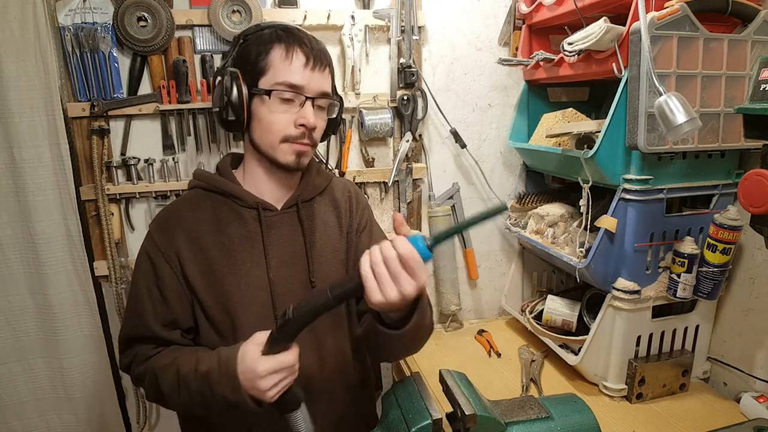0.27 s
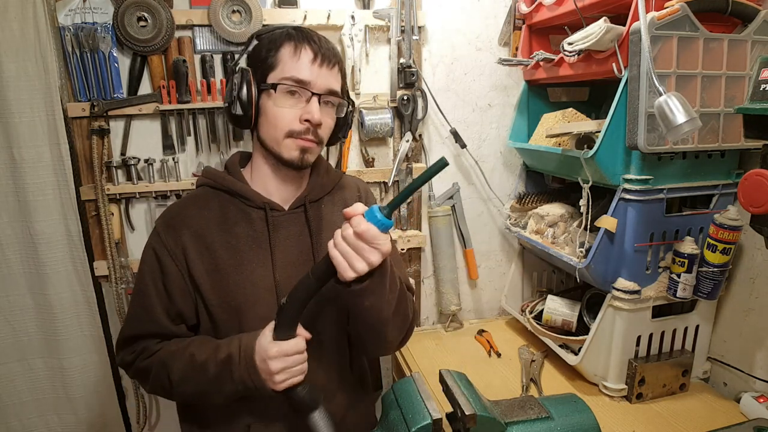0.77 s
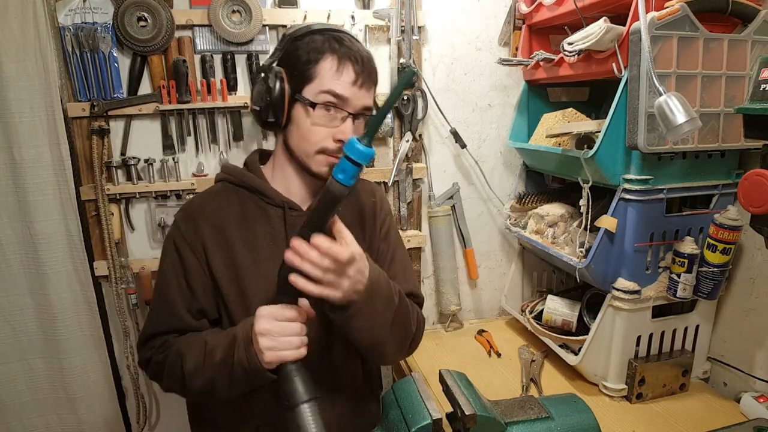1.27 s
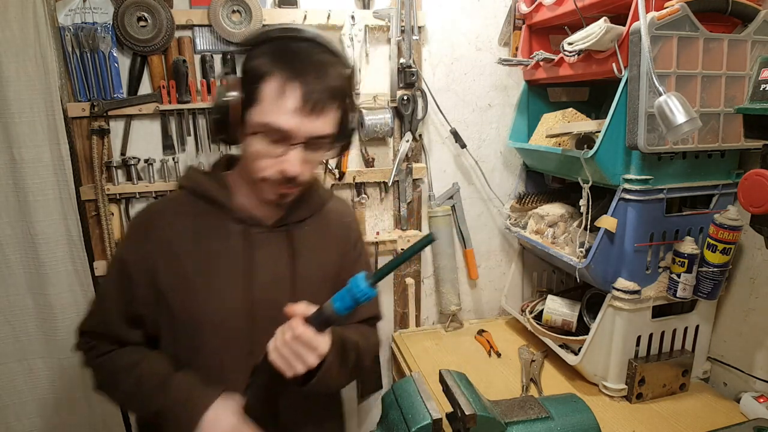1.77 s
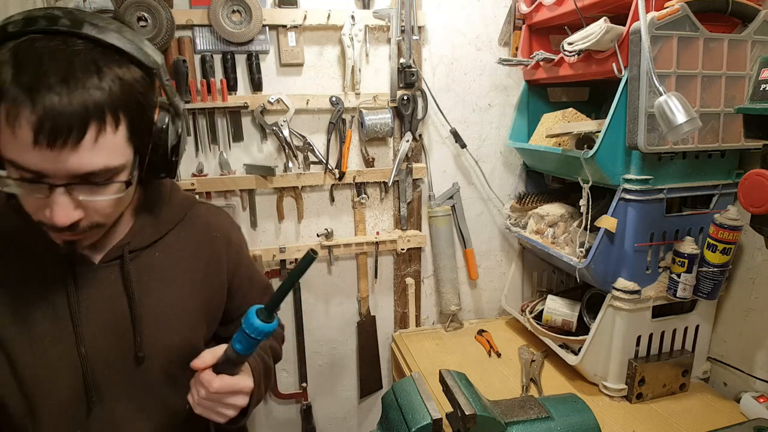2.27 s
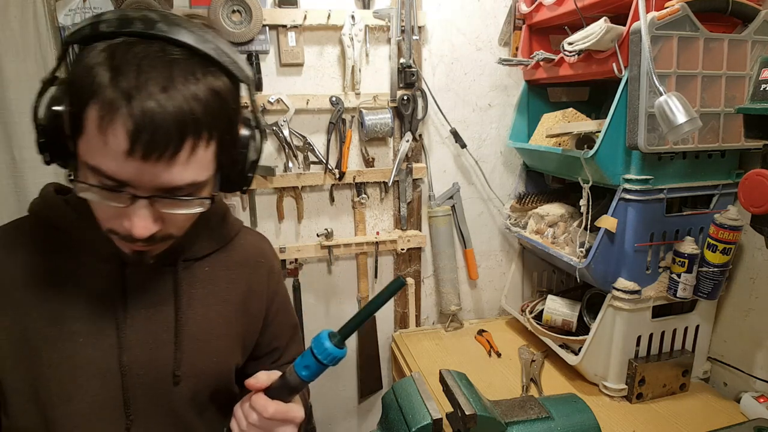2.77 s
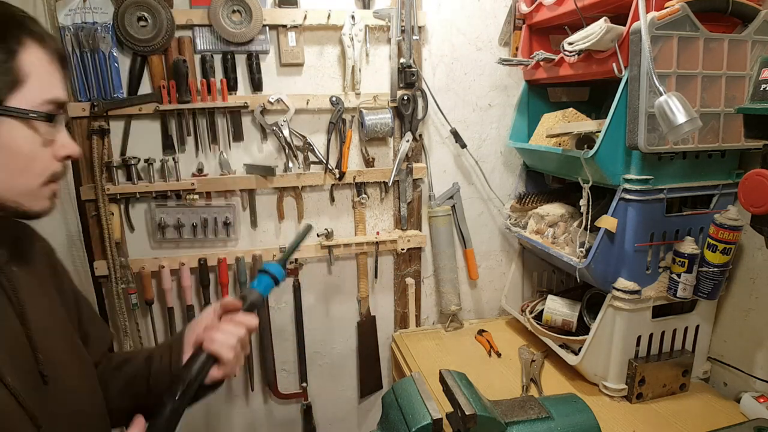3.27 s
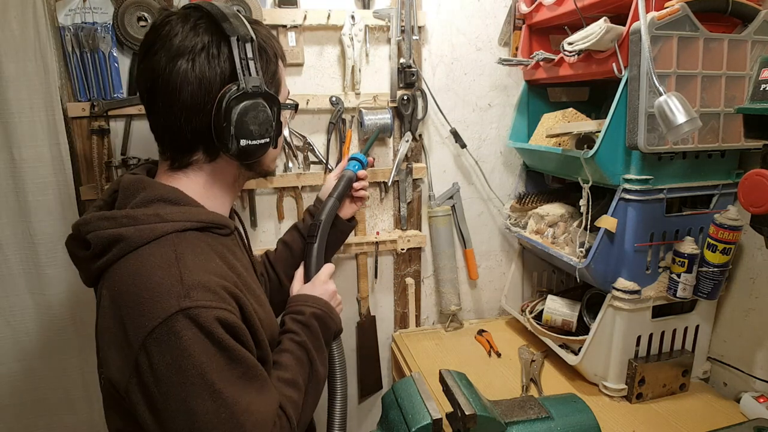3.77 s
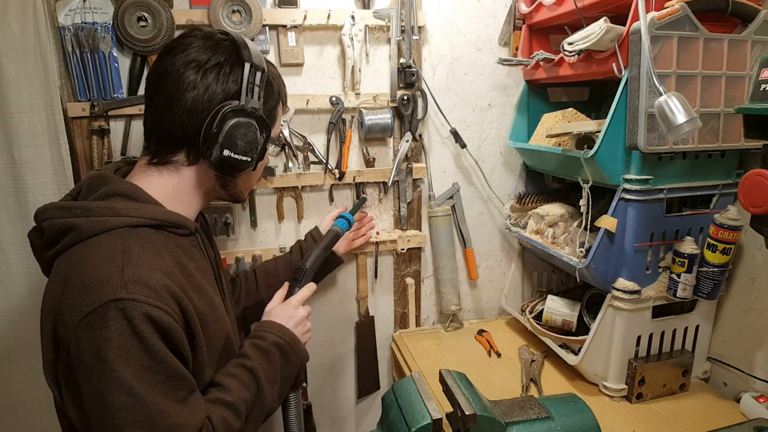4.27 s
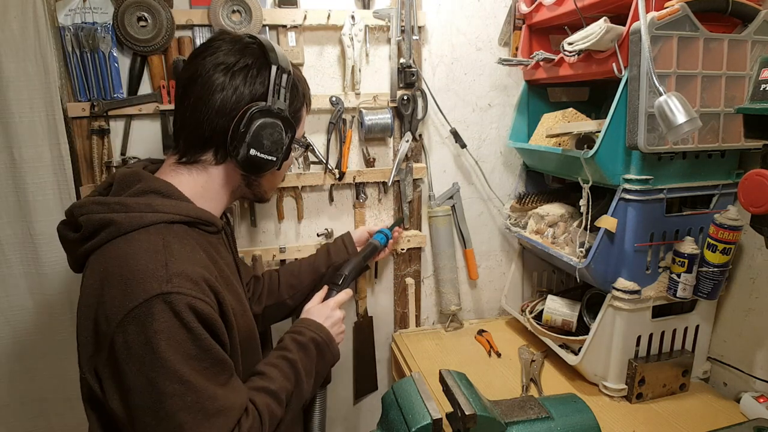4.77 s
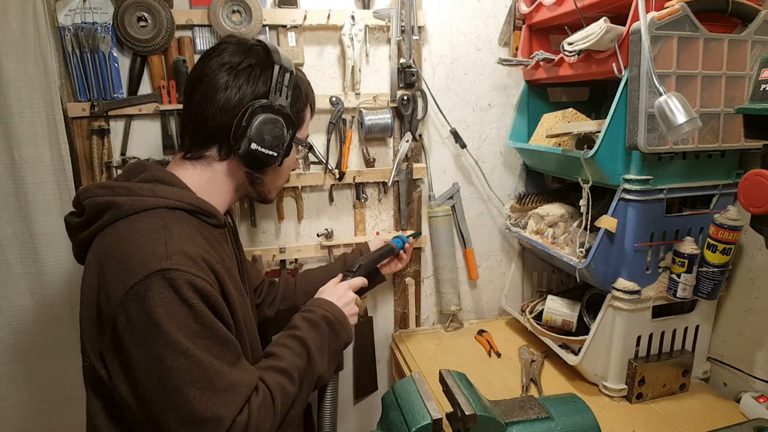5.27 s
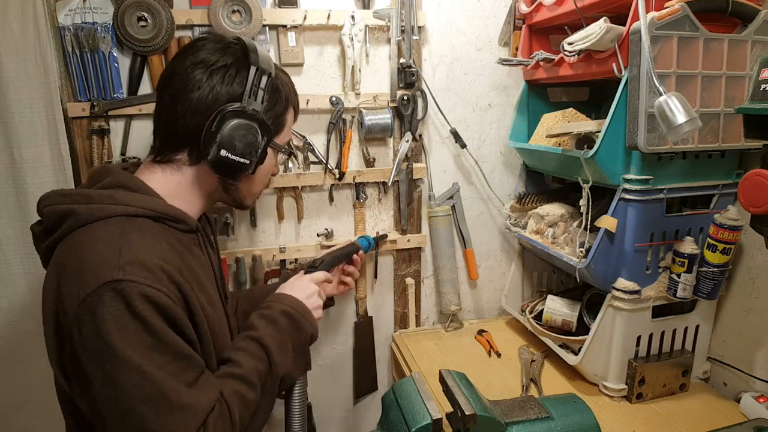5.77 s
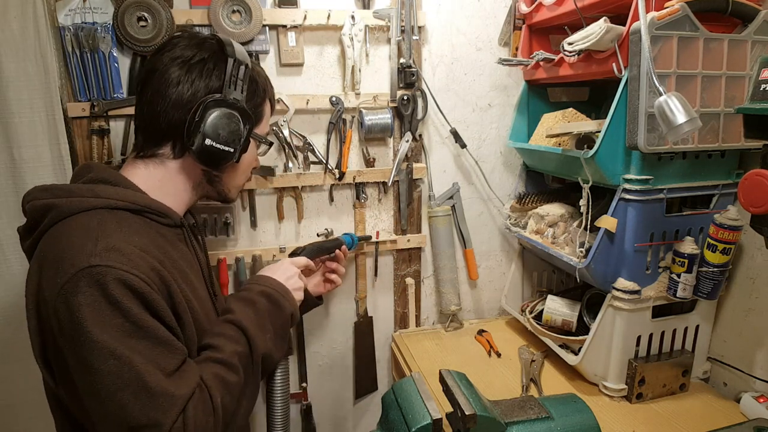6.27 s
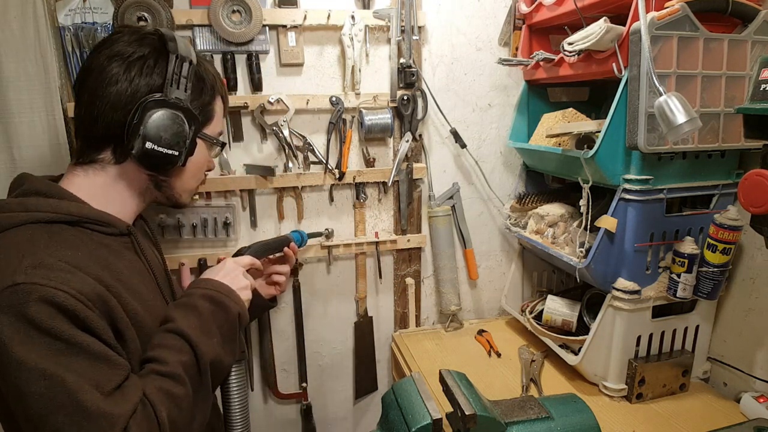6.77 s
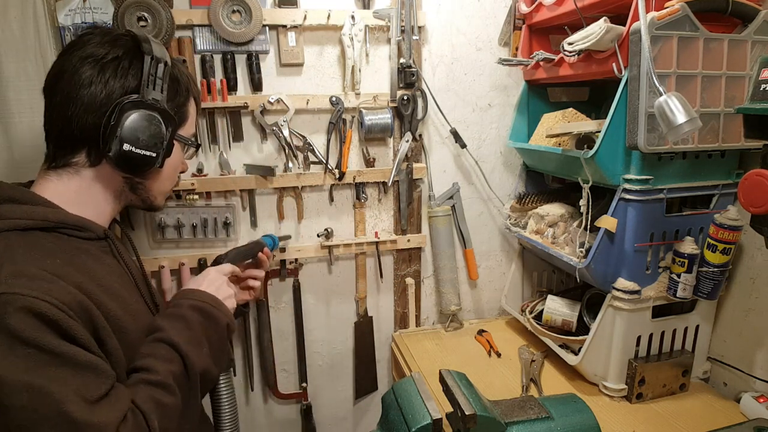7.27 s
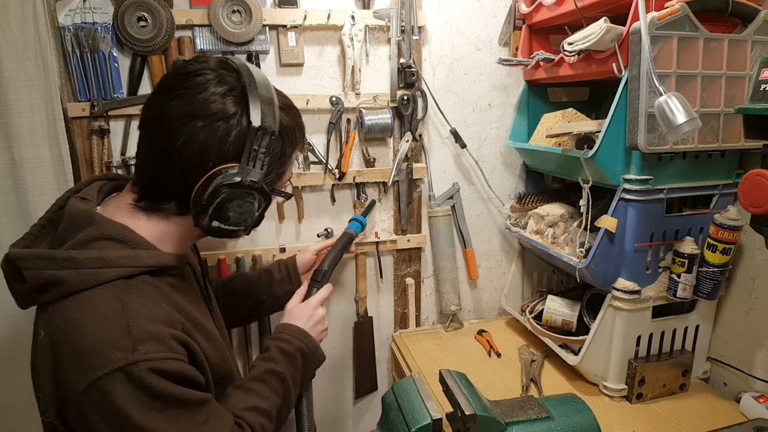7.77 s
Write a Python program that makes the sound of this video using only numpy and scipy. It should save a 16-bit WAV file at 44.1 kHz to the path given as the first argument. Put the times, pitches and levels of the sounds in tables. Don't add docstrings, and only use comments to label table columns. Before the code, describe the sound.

Faint plastic squeaks, clicks and soft footsteps in a quiet workshop, then a shop vacuum spins up abruptly and roars steadily with hissing nozzle air.

```python
import sys
import numpy as np
from scipy import signal
from scipy.fft import rfft, irfft, next_fast_len
from scipy.io import wavfile
from scipy.ndimage import uniform_filter1d, map_coordinates

SR = 44100
rng = np.random.default_rng(int(sys.argv[2]) if len(sys.argv) > 2 else 0)


def gain_from_decibels(decibels):
    exponent = np.asarray(decibels, float) / 20
    return 10 ** exponent


def log_audio(samples):
    frames = np.atleast_2d(samples).T
    limited = np.clip(frames, -1, 1)
    pcm = np.round(limited * 32767).astype(np.int16)
    wavfile.write(sys.argv[1], SR, pcm)


N = 354211
T = np.arange(N) / SR
ON_S = 3.056
SWITCH_ON = np.clip((T - ON_S) / .012, 0, 1)
EARLY_UNTIL_S = 3.77
MAINS_BUZZ_HZ = 99.8


def unit(x):
    return x / np.sqrt(np.mean(x ** 2) + 1e-20)


def along(points, hz):
    f, v = np.transpose(points)
    return np.interp(np.log(hz + 1), np.log(f + 1), v)


def curve(rows):
    s, value = np.transpose(rows)
    return np.interp(T, s, value)


def wobble(rate):
    return map_coordinates(rng.standard_normal(int(N * rate / SR) + 4), [T * rate])


def swells(rows, rise, fall, rest_db):
    s, db, hold = np.transpose(rows)[..., None]
    t = T[::32]
    rising = rise * np.maximum(s - t, 0)
    falling = fall * np.maximum(t - s - np.abs(hold), 0)
    shapes = db - rising - falling
    return np.interp(T, t, np.maximum(shapes.max(axis=0), rest_db))


def filtered(x, response):
    m = next_fast_len(len(x) + 8192)
    return irfft(rfft(x, m) * response(np.fft.rfftfreq(m, 1 / SR)), m)[:len(x)]


def rush(spectrum, patchy_db, modes=()):
    z = signal.stft(rng.standard_normal(N), nperseg=512)[2]
    patches = uniform_filter1d(rng.standard_normal(z.shape), size=6, axis=0)
    patches = uniform_filter1d(patches, size=12, axis=1)
    x = signal.istft(z * gain_from_decibels(patchy_db * unit(patches)), nperseg=512)[1][:N]

    def colour(hz):
        lift_db = sum(db / (1 + (2 * (hz - c) / w) ** 2) for c, w, db in modes)
        return gain_from_decibels(along(spectrum, hz) + lift_db) * np.minimum(hz / spectrum[0][0], 1) ** 4

    return unit(filtered(x, colour))


def bursts(rows, grain_db, edge, size):
    out = np.zeros(N + SR)
    for s, length, hz, width_hz, db in rows:
        n = min(round(length * SR), size)
        grain = np.repeat(rng.standard_normal(size // 64 + 1), 64)[:n]
        x = rng.standard_normal(size)[:n] * gain_from_decibels(grain_db * grain)

        def resonance(f):
            peak = (1 + (2 * (f - hz) / width_hz) ** 2) ** -.8
            return peak * np.minimum(2 * f / hz, 1) ** 2

        swell = signal.windows.tukey(n, np.clip(edge, 0, 1))
        out[round(max(s, 0) * SR):][:n] += gain_from_decibels(db) * unit(filtered(x, resonance)) * swell
    return out[:N]


def shaken(envelope, spectrum):
    noise = rng.standard_normal(N)
    colour = lambda hz: gain_from_decibels(along(spectrum, hz))
    return filtered(envelope[:N] * noise, colour) / np.std(filtered(noise, colour))


def walls(x, t60, top_hz):
    t = np.arange(SR // 2) / SR
    tail = rng.standard_normal(len(t)) * gain_from_decibels(-60 * t / t60)
    tail = filtered(tail, lambda f: 1 / (1 + (f / top_hz) ** 2))
    return signal.fftconvolve(np.pad(x, (200, 0)), tail / np.linalg.norm(tail))[:N]


# frequency in Hz, level in dB per Hz.
ROOM_TONE = [(32, -32), (55, -1), (435, -6.5), (511, -7.5), (823, -9.5), (901, -9), (6090, -23),
             (12600, -28.5), (16400, -53), (22000, -120)]


def room_air():
    return gain_from_decibels(-75.2 + .5 * wobble(5)) * rush(ROOM_TONE, patchy_db=.4)


def ticks():
    first_s, rate_hz, width_s = .0081, 63.0, .00009
    cycle = (T - first_s) * rate_hz
    nearest = np.round(cycle).astype(int)
    size = gain_from_decibels(-62.5 + 1.5 * rng.standard_normal(nearest.max() + 1))[nearest]
    spikes = -size * np.exp(-.5 * ((cycle - nearest) / rate_hz / width_s) ** 2)
    return spikes - uniform_filter1d(spikes, size=120)


# start in seconds, level in dB, hold in seconds.
FOOTSTEPS = [
    (0, -68, .02),
    (.25, -68, 0.19),
    (1.19, -55.5, 0.11),
    (1.86, -63, 0.031),
    (2.12, -45.5, 0.035),
    (2.46, -45, 0.036),
    (2.6, -52.5, 0.033),
    (2.8, -71, 0.082),
]
# frequency in Hz, level in dB per Hz.
FLOORBOARDS = [(15, -45), (25, -11), (48, -9), (70, 1), (86, -12), (99, -8), (145, -20), (300, -27.5),
               (390, -59), (660, -120)]


def footsteps():
    ring = np.sqrt(2) * np.sin(2 * np.pi * np.cumsum(85 + 4 * wobble(15)) / SR)
    rumble = rush(FLOORBOARDS, patchy_db=1.0)
    return gain_from_decibels(swells(FOOTSTEPS, 550, 118, rest_db=-95)) * (0.72 * ring + 0.44 * rumble)


# start in seconds, level in dB, hold in seconds.
RUSTLES = [(0, -68, 0.05), (.1, -67, .06), (.762, -76, .005), (.89, -73, .01), (1.155, -62, .002),
           (1.54, -68, .03), (1.72, -70, .05), (1.85, -67, 0.024), (2.038, -68.5, 0.024),
           (2.15, -75.5, 0.089), (2.436, -70, 0.21), (2.75, -76, 0.026)]
# frequency in Hz, level in dB per Hz.
CLOTH_TONE = [(500, -1), (2000, 4), (5000, 1), (9000, -4.5), (13000, -13), (16000, -50)]


def sleeves():
    crackle = rush(CLOTH_TONE, patchy_db=3.5) * gain_from_decibels(2.0 * wobble(250))
    return gain_from_decibels(swells(RUSTLES, 240, 190, rest_db=-92) - 5.5) * unit(crackle)


# start in seconds, length in seconds, centre in Hz, width in Hz, level in dB.
SQUEAKS = [(0, 0.057, 2700, 400, -69), (.09, 0.035, 5400, 600, -68), (.115, 0.044, 4700, 1200, -69),
           (.29, .13, 4220, 4000, -77), (.845, 0.03, 4700, 300, -73), (.875, .035, 4700, 300, -73),
           (.84, 0.11, 3600, 300, -73), (.75, 0.038, 3650, 300, -71), (1.46, 0.056, 2980, 150, -76),
           (1.49, 0.085, 4760, 900, -66.5), (1.5, 0.068, 7500, 300, -72), (1.51, .05, 8900, 500, -76),
           (1.85, .05, 9500, 1500, -78), (.1, .09, 1000, 1200, -73), (1.55, 0.11, 5200, 900, -74),
           (1.56, .08, 3850, 200, -77), (1.71, .08, 2370, 400, -74), (1.82, 0.095, 2610, 400, -67),
           (1.83, 0.086, 5430, 600, -67.5), (2.0, 0.092, 4400, 500, -67), (2.04, 0.048, 6200, 800, -76),
           (2.422, 0.03, 500, 200, -65), (2.43, .06, 6800, 500, -72), (2.43, .06, 5200, 1000, -70),
           (2.52, .06, 4700, 350, -79), (2.52, .04, 2000, 400, -75), (2.44, .15, 3500, 4000, -74),
           (2.56, .14, 2000, 2500, -71), (1.81, .09, 3750, 200, -77), (.1, .06, 6750, 300, -75),
           (.31, .05, 5450, 200, -77), (0, .04, 3600, 300, -73), (2.585, 0.046, 4150, 300, -73),
           (2.62, .07, 4700, 200, -83), (2.66, .06, 5450, 300, -82), (2.47, 0.04, 3600, 400, -75),
           (2.43, 0.046, 1500, 700, -70.5), (2.428, 0.047, 6500, 3500, -69), (2.53, 0.1, 780, 250, -67),
           (2.57, 0.075, 1550, 350, -65.5), (2.565, 0.08, 2750, 250, -74)]


def squeaks():
    return bursts(SQUEAKS, grain_db=2.5, edge=0.99, size=SR // 5)


# start in seconds, peak in dB, ring in Hz, time to fade by 60 dB in seconds.
COLLAR_CLICKS = [(.1055, -54, 4100, .008), (.118, -41, 3910, 0.015), (.1185, -56, 9500, .008),
                 (.119, -60, 800, .04), (.14, -56, 3700, .01), (0.755, -46, 3110, 0.014),
                 (.7555, -62, 7000, .006), (.881, -54, 3600, .015), (.8905, -58, 3600, .012),
                 (.914, -61, 3550, .015), (2.427, -65, 430, 0.035), (2.5745, -49, 1300, 0.03),
                 (2.594, -54, 1500, .02)]


def clicks():
    out, t = np.zeros(N + SR), np.arange(SR // 4) / SR
    for s, db, hz, t60 in COLLAR_CLICKS:
        band = lambda f: np.minimum(f / hz, 1) ** 3 / (1 + (f / (1.3 * hz)) ** 8)
        scrape = filtered(rng.standard_normal(len(t)), band)
        ring = np.sin(2 * np.pi * hz * t) + 0.62 * np.sin(2 * np.pi * 1.3 * hz * t)
        shape = gain_from_decibels(-60 * t / t60) * (1 - np.exp(-t / 0.0019))
        out[round(s * SR):][:len(t)] += gain_from_decibels(db + 2.0) * (ring + 1.5 * scrape) * shape
    return out[:N]


# start in seconds, peak in dB.
SEATING = [
    (1.176, -38.5),
    (1.1907, -41),
    (1.2073, -47),
    (1.232, -56),
]
# frequency in Hz, level in dB per Hz.
SHELL = [(500, -30), (800, -6), (1300, 0.5), (1800, -2.5), (2300, -14), (3500, -5.5), (5000, -13.5),
         (7000, -7), (10000, -16), (13000, -38), (15000, -90)]
# frequency in Hz, level in dB per Hz.
HOSE_HOLLOW = [(53, -34), (90, -1), (311, -6), (383, -2), (650, -12), (840, -42), (1430, -120)]


def knock():
    rattle, thud = np.zeros((2, N + SR))
    t = np.arange(SR // 4) / SR
    for s, db in SEATING:
        start = round(s * SR)
        snap_and_tail = 1.4 * gain_from_decibels(-60 * t / 0.0045) + 0.77 * gain_from_decibels(-60 * t / 0.12)
        rattle[start:][:len(t)] += gain_from_decibels(db - 10.5) * snap_and_tail
        thud[start:][:len(t)] += gain_from_decibels(db - 7.5) * gain_from_decibels(-60 * t / 0.14) * (1 - np.exp(-t / 0.0026))
    return shaken(rattle, SHELL) + shaken(thud, HOSE_HOLLOW)


# start in seconds, peak in dB.
HOSE_BUMPS = [(4.093, -56), (4.49, -60), (4.83, -55), (4.945, -58), (5.315, -53), (5.695, -53), (5.89, -61),
              (6.3, -60), (6.54, -57), (7.371, -54)]


def bumps():
    out, t = np.zeros(N + SR), np.arange(SR // 8) / SR
    for s, db in HOSE_BUMPS:
        push = np.sin(2 * np.pi * 70 * t) * (1 - np.exp(-t / .004))
        out[round((s + .015) * SR):][:len(t)] += gain_from_decibels(db + 7 - 60 * t / .12) * push
    return filtered(out[:N], lambda f: np.minimum(f / 45, 1) ** 2)


# start in seconds, level in dB, hold in seconds.
DRUM_GULPS = [(3.1, -30.5, 0.044), (3.18, -29.5, 0.027), (3.26, -31.5, 0.037), (3.36, -31.5, 0.04),
              (3.445, -31, 0.018), (3.58, -29, 0.036), (3.645, -29, .02), (3.7, -29.5, 0.019),
              (4.13, -32.5, 0.0057), (4.2, -39.5, 0.15), (4.35, -36.5, 0.048), (4.51, -31, 0.011),
              (4.6, -40.5, 0.7), (6.76, -38.5, 0.057)]
# frequency in Hz, level in dB per Hz.
EARLY_DRUM = [(26, -64), (45, -32), (81, -22), (113, -18), (183, -13), (220, -2.5), (338, -0.5),
              (520, -15.5), (680, -29), (1140, -120)]
# frequency in Hz, level in dB per Hz.
LATER_DRUM = [(26, -62), (45, -48), (68, -39), (120, -23), (150, -10), (257, -2.5), (349, 0.5), (520, -7),
              (680, -24), (1140, -120)]
# centre in Hz, width in Hz, lift in dB.
DRUM_RINGS = [(165, 54, 8.5), (226.6, 25, 7.5)]


def drum_roar(early, build_up):
    rest_db = -42.5
    level_db = np.maximum(swells(DRUM_GULPS, 380, 300, rest_db=rest_db), rest_db + 8 * early)
    level_db = level_db - 35 * build_up
    booming = early * rush(EARLY_DRUM, patchy_db=-0.5, modes=DRUM_RINGS)
    steady = (1 - early) * rush(LATER_DRUM, patchy_db=1.0)
    return gain_from_decibels(level_db + 0.3 * wobble(22)) * (booming + steady)


# frequency in Hz, level in dB per Hz.
EARLY_COLUMN = [(280, -35), (480, -5.5), (724, -3), (1050, -10), (1730, -10), (2400, -13.5), (3120, -21),
                (5280, -120)]
# frequency in Hz, level in dB per Hz.
LATER_COLUMN = [(280, -28), (480, -6.5), (812, -1.5), (1010, -7.5), (1140, -5), (2400, -11.5), (3120, -17),
                (5280, -120)]
# centre in Hz, width in Hz, lift in dB.
HOSE_RINGS = [(815, 16, 7), (898, 49, 5.5), (1146, 104, 6), (1820, 710, 6)]


def hose_rush(early, build_up, facing_db, surge):
    level_db = -37 + facing_db - 25 * build_up
    early_rush = early * rush(EARLY_COLUMN, patchy_db=1.7)
    later_rush = (1 - early) * rush(LATER_COLUMN, patchy_db=0.5, modes=HOSE_RINGS)
    return gain_from_decibels(level_db - 2.0 + 0.29 * surge) * (early_rush + later_rush)


# frequency in Hz, level in dB per Hz.
JET_TONE = [(1470, -28), (2500, -3.5), (2830, 0), (5240, -2.5), (5570, -2.5), (6240, -5), (8600, -9),
            (11200, -30), (18900, -120)]
# centre in Hz, width in Hz, lift in dB.
NOZZLE_RINGS = [(2115, 80, 5), (3670, 130, 2.5), (4760, 140, 2.2), (5470, 56, 4.5), (5865, 46, 2.5),
                (9200, 400, 2.5)]


def nozzle_jet(early, build_up, facing_db, tip_lift_db, surge):
    level_db = -41 + 2.5 * early + 0.22 * facing_db + 0.2 * tip_lift_db - 59 * build_up
    return gain_from_decibels(level_db - 0.96 + .5 * surge) * rush(JET_TONE, patchy_db=1.4, modes=NOZZLE_RINGS)


# frequency in Hz, level in dB per Hz.
FIZZ_TONE = [(4710, -18), (8000, -2.5), (9380, 2), (10700, -2.5), (11700, -4), (11900, -5), (15600, -18)]


def tip_fizz(tip_db, build_up):
    level_db = tip_db - 110 * build_up
    return gain_from_decibels(level_db - 1.05 + 0.48 * wobble(25)) * rush(FIZZ_TONE, patchy_db=1.3)


# time in seconds, level in dB.
HOSE_FACING = [(3.3, 1), (4.1, 1.5), (4.17, -0.5), (4.38, 1), (4.46, 3), (5.17, 2), (5.7, 2.5), (5.8, -1),
               (7.36, 0), (7.46, 2.5), (8.03, 3.5)]
# start in seconds, level in dB, hold in seconds.
TIP_EDGES = [(4.4, -38.5, 0.03), (4.84, -48, .005), (4.98, -44.5, 0.069), (5.1, -45, .03),
             (6.1, -46.5, .05), (6.18, -40.5, 0.0042), (6.74, -40, .01), (6.81, -37, 0.0045),
             (7.43, -44, 0.015), (7.5, -44, 0.012), (7.77, -47, .01), (7.93, -46, 0.011)]
# start in seconds, length in seconds, centre in Hz, width in Hz, level in dB.
AIR_SWELLS = [(4.336, 0.034, 10600, 2200, -40), (4.375, .05, 13200, 2500, -44),
              (4.425, 0.034, 3800, 2700, -34), (4.66, 0.044, 13500, 3000, -53),
              (4.41, 0.065, 2450, 700, -45), (8, 0.04, 4600, 2500, -41), (7.24, 0.06, 9000, 1500, -46),
              (7.415, 0.045, 4200, 2500, -40), (7.485, .03, 9000, 700, -47), (7.5, .035, 2000, 900, -41),
              (7.43, .04, 1200, 600, -42), (7.42, 0.038, 10500, 1200, -46), (7.405, .03, 1900, 540, -40),
              (7.485, 0.047, 3800, 2000, -38.5), (6.7, .035, 9100, 800, -48), (6.36, .08, 3700, 400, -49),
              (7.53, 0.065, 3400, 2500, -44), (3.2, 0.54, 8000, 300, -50), (3.14, .65, 7800, 1500, -50),
              (3.15, .12, 7000, 500, -51), (3.59, .1, 8000, 200, -52), (6.08, .14, 380, 150, -43),
              (7.7, .3, 400, 160, -45), (5.0, .2, 400, 150, -45), (3.85, .2, 280, 80, -45),
              (6.95, .4, 905, 35, -52), (4.42, .04, 5200, 1500, -44), (4.4, 1.34, 900, 45, -48),
              (3.14, .63, 3500, 400, -49), (3.14, .63, 2000, 400, -48), (6.8, .04, 4500, 400, -47),
              (4.48, .06, 280, 60, -38), (5.8, 1.4, 810, 32, -55.5), (4.08, .36, 160, 50, -47),
              (4.1, .33, 270, 60, -42), (4.4, .9, 1140, 80, -47), (5.24, 0.19, 1150, 70, -41.5),
              (5.46, .24, 1150, 70, -42.5), (4.42, .26, 880, 60, -48), (7.38, 0.62, 1150, 110, -45.5)]


def airflow():
    early = np.clip((EARLY_UNTIL_S - T) / 0.0096, 0, 1)
    build_up = np.exp(-np.maximum(T - ON_S, 0) / 0.031)
    tip_rest_db = -50.5
    facing_db = curve(HOSE_FACING)
    tip_db = swells(TIP_EDGES, 220, 350, rest_db=tip_rest_db)
    surge = wobble(8.2)
    roar = drum_roar(early, build_up)
    hiss = hose_rush(early, build_up, facing_db, surge)
    hiss = hiss + nozzle_jet(early, build_up, facing_db, tip_db - tip_rest_db, surge)
    hiss = hiss + tip_fizz(tip_db, build_up)
    hiss = hiss * SWITCH_ON + bursts(AIR_SWELLS, grain_db=1.0, edge=0.45, size=3 * SR // 2)
    return roar * SWITCH_ON + hiss + gain_from_decibels(-11.5) * walls(hiss, t60=.07, top_hz=30000)


# time in seconds, turns per second in Hz.
FAN_SPEED = [(3.75, 735.5), (3.82, 712), (3.9, 702.5), (4.1, 697), (4.19, 706), (4.25, 718), (4.55, 718.5),
             (4.62, 709.5), (4.95, 704.4), (5.06, 711.2), (5.2, 704.5), (5.7, 702.5), (5.88, 712),
             (6.7, 713), (6.9, 716), (7.0, 712.8), (7.27, 714.5), (7.6, 706.1), (8.03, 706.3)]
# start in seconds, level in dB, hold in seconds.
SHAFT_1 = [(3.11, -46, .02), (3.142, -39.5, .015), (3.19, -47, .02), (3.225, -38.5, .03), (3.29, -47, .03),
           (3.345, -38, .1), (3.47, -46, .11), (3.62, -47, .16), (3.8, -42, .42), (4.27, -44.5, .08),
           (4.5, -45.5, .15), (5.02, -54, .1), (5.53, -51, .02), (5.86, -46.5, .2), (6.1, -44.5, .08),
           (6.22, -46.5, .18), (6.44, -44, .12), (6.59, -45, .18), (6.8, -44.5, .1), (6.94, -43.5, .24),
           (7.22, -46, .1), (7.38, -48, .06), (7.5, -52, .15)]
# start in seconds, level in dB, hold in seconds.
SHAFT_2 = [(3.27, -46, .06), (3.38, -48, .03), (3.42, -46, .035), (3.49, -45, .1), (3.62, -48, .13),
           (4.2, -49.5, .3), (5.05, -63, .15), (6.2, -48.5, 0.024), (6.75, -49.5, 0.2)]
# start in seconds, level in dB, hold in seconds.
SHAFT_4 = [(4.0, -62, 0.021), (4.34, -58, .02), (5.02, -54, .02), (5.2, -56.5, .45), (5.86, -49.5, 0.15),
           (7.23, -58, .02)]
# start in seconds, level in dB, hold in seconds.
SHAFT_8 = [(3.236, -46, .018), (3.285, -46.5, .035), (3.35, -45, .04), (3.42, -46.5, 0.06),
           (3.49, -50, .04), (3.56, -54, 0.2), (3.885, -40.5, 0.027), (3.95, -57, .12), (4.15, -39, 0.023),
           (4.26, -53, .04), (4.445, -49, .03), (4.53, -53, .02), (4.62, -44.5, 0.04), (4.66, -47.5, .04),
           (4.75, -44.5, 0.045), (4.865, -44.5, 0.05), (4.92, -47.5, .035), (5.02, -51, .02),
           (5.09, -46.5, .03), (5.155, -44, 0.06), (5.26, -51, .04), (5.36, -54, .08), (5.51, -46.5, 0.09),
           (5.63, -52, .04), (5.74, -51, .02), (5.8, -45.5, .09), (5.9, -49, .07), (6.0, -48, 0.12),
           (6.31, -49.5, .2), (6.6, -56, .1), (6.78, -52, .03), (6.88, -53, .06), (6.97, -55, .15),
           (7.2, -53.5, 0.091), (7.36, -53, .15), (7.6, -44.5, 0.05), (7.7, -53, .03), (7.78, -50, .05),
           (7.86, -52, .08), (7.97, -54, .05)]
# start in seconds, level in dB, hold in seconds.
SHAFT_16 = [(3.3, -67, .08), (3.42, -60, .06), (3.52, -66, .08), (3.64, -61, .12), (3.82, -63, .05),
            (3.91, -60, .04), (4.03, -60, .03), (4.1, -63, .06), (4.25, -62, .15), (4.69, -56, .02),
            (5.0, -61, .7), (5.83, -55, .02), (5.95, -60.5, .5), (6.58, -54, 0.029), (6.98, -58, .02),
            (7.27, -55, .02), (7.6, -61, .3), (7.98, -54, .05)]
# start in seconds, level in dB, hold in seconds.
BEATING = [(4.48, -49, .2), (4.75, -51, .2), (5.03, -47, 0.34), (5.95, -49, .12), (6.45, -50, 0.13),
           (6.7, -47, 0.2), (7.12, -50, .06), (7.55, -50.5, .15)]
# start in seconds, level in dB, hold in seconds.
MAINS_BUZZ = [
    (3.095, -37.5, 0.027),
    (4.5, -44, 0.024),
    (5.05, -47.5, .02),
    (5.32, -50, .02),
]


def motor():
    spin_up = 1 - np.exp(-np.maximum(T - 3.043, 0) / .0695)
    speed = curve(FAN_SPEED) * spin_up
    phase = 2 * np.pi * np.cumsum(speed * (1 + .0008 * wobble(40))) / SR
    orders = np.array([[1], [2], [4], [8], [16]])
    flicker_db = 1.4 * np.array([wobble(38) for _ in orders])
    levels_db = np.array([swells(SHAFT_1, 250, 200, rest_db=-62),
                          swells(SHAFT_2, 150, 150, rest_db=-71),
                          swells(SHAFT_4, 70, 70, rest_db=-69),
                          swells(SHAFT_8, 380, 600, rest_db=-59),
                          swells(SHAFT_16, 100, 100, rest_db=-83)])
    tones = np.sum(gain_from_decibels(levels_db + 3.0 + flicker_db) * np.sin(orders * phase), axis=0)
    mains = 2 * np.pi * np.cumsum(MAINS_BUZZ_HZ + 3.5 * wobble(14)) / SR
    beat_db = swells(BEATING, 150, 150, rest_db=-60) + 2.5 + 2.6 * wobble(20)
    tones = tones + gain_from_decibels(beat_db) * np.sin(phase + mains)
    early_dip_db = 6 * ((T > 3.2) & (T < EARLY_UNTIL_S))
    buzz_db = swells(MAINS_BUZZ, 400, 220, rest_db=-55) - early_dip_db + 0.5 + 1.3 * wobble(12)
    buzz = gain_from_decibels(buzz_db) * np.sin(mains)
    return tones * np.clip((T - 3.08) / 0.063, 0, 1) + buzz * SWITCH_ON


# time in seconds, level in dB.
QUIET_DIP = [
    (0, 1),
    (3.035, 2.5),
    (3.044, -19),
    (3.056, -12),
    (3.07, 15),
]


def scene():
    hands = squeaks() + clicks() + knock() + sleeves()
    echo = gain_from_decibels(-11.5) * walls(hands, t60=0.28, top_hz=9000)
    quiet = hands + echo + footsteps() + room_air() + ticks()
    mono = quiet * gain_from_decibels(curve(QUIET_DIP)) + motor() + airflow() + bumps()
    return np.array([mono, mono])


def low_pass(x):
    return signal.sosfilt(signal.butter(12, 15710, fs=SR, output="sos"), x)


def record(dry):
    return low_pass(dry)


dry = scene()
out = record(dry)
log_audio(out)
```